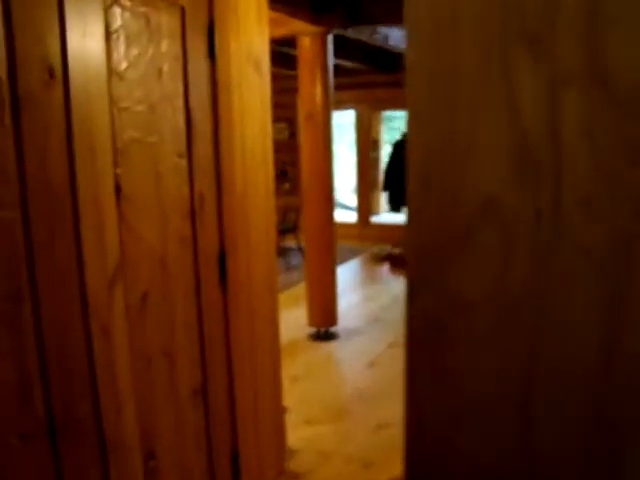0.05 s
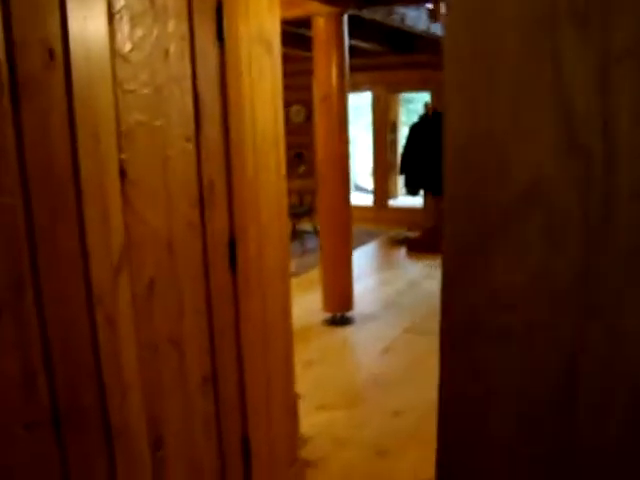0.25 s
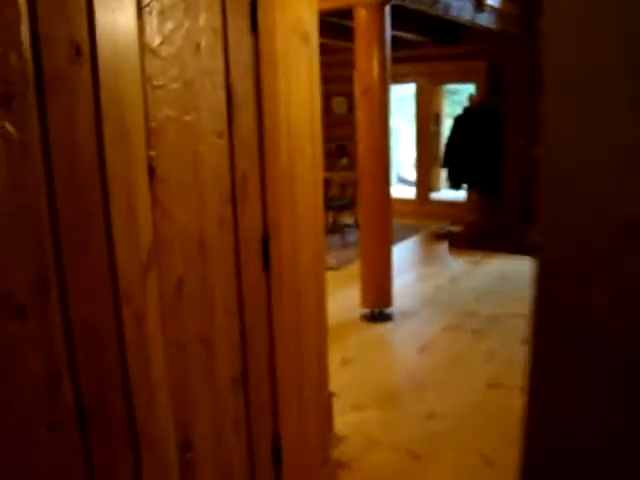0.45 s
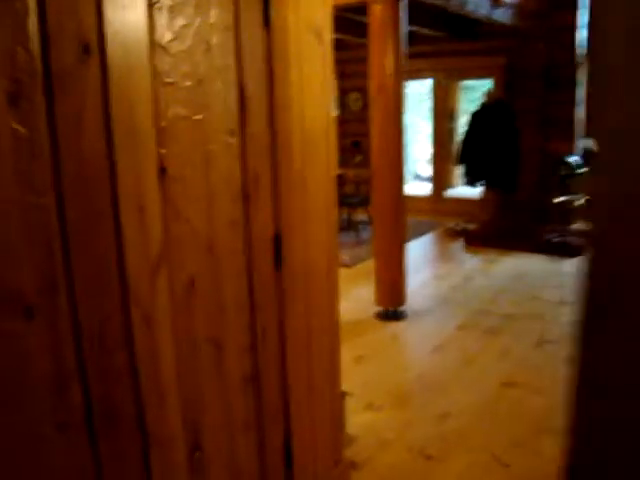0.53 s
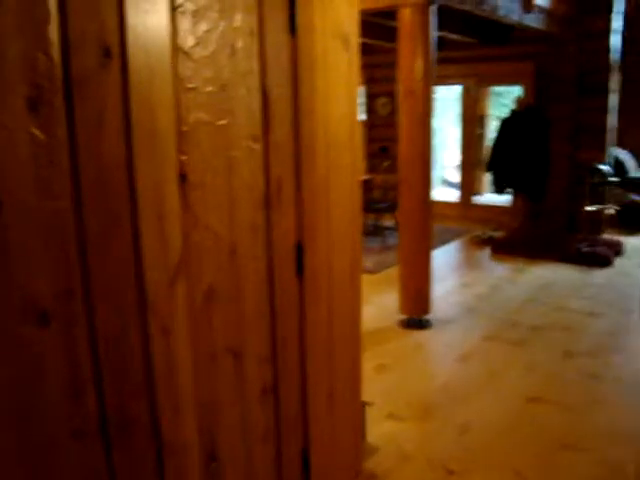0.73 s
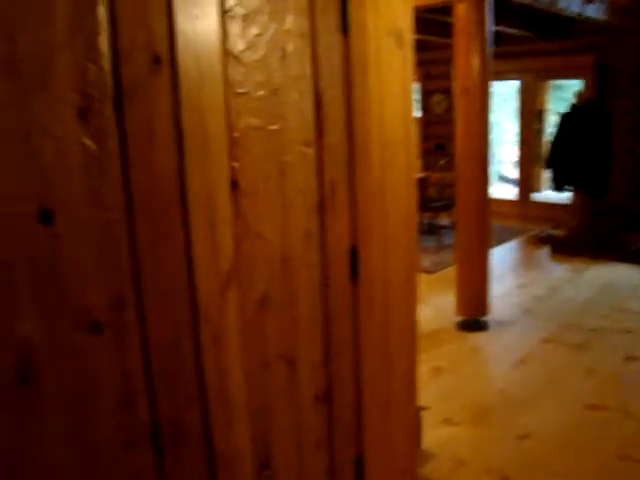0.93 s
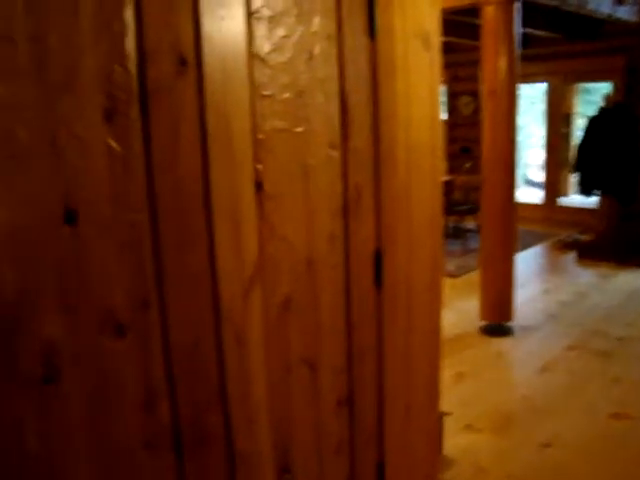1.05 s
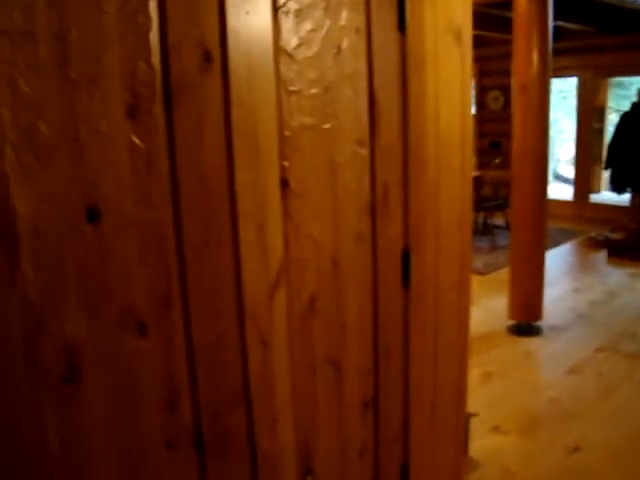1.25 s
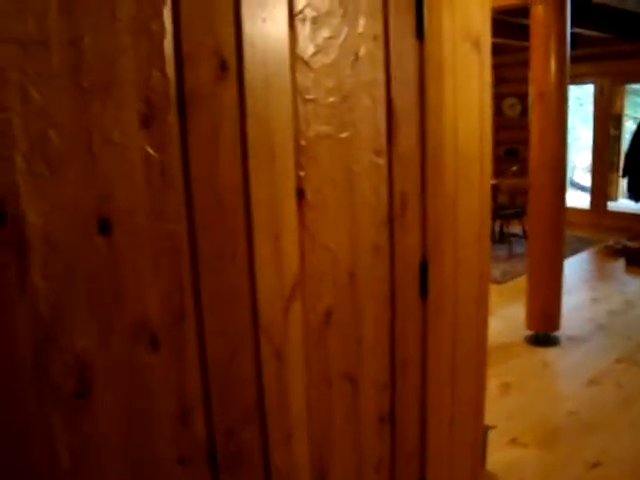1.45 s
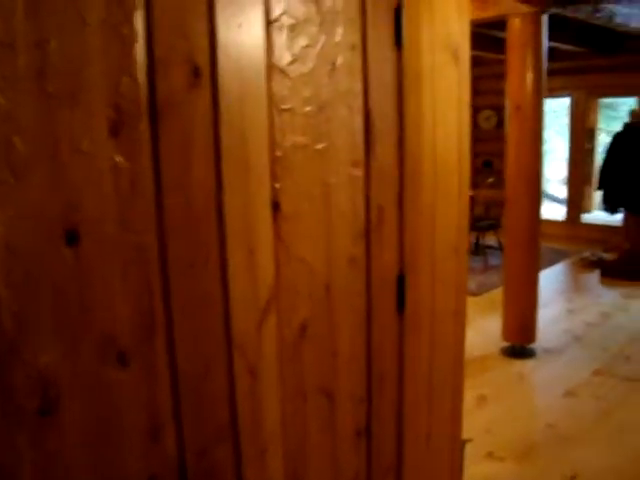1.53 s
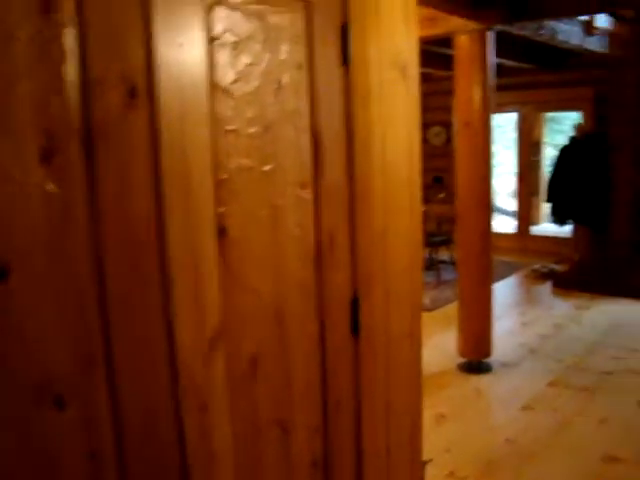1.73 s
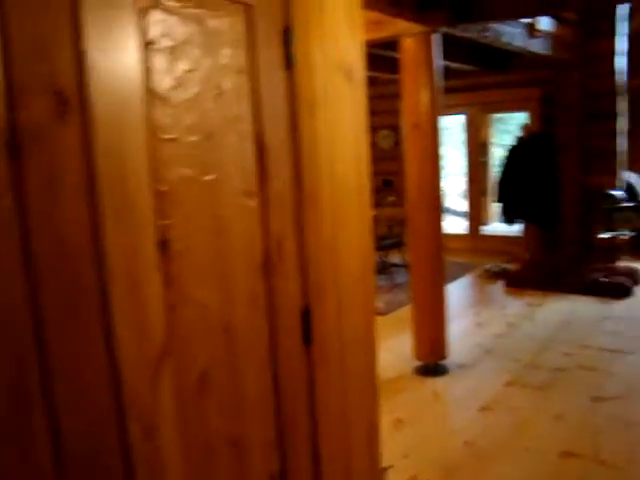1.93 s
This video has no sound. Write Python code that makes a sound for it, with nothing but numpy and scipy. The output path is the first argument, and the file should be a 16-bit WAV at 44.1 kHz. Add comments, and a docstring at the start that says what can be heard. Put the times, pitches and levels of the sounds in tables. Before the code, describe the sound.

A wooden door gives a dry, harsh creak, then a brief loud stutter from its hinge, and settles with several dull knocks. The microphone picks up a slight room echo and steady low hiss inside a quiet cabin.

```python
"""A creaking wooden door

A door swings open in a quiet log cabin. Its dry hinge sticks and slips: a long creak that slows down,
a short run of hard jerks, then a few dull knocks as it comes to rest. Every slip rings the same door
and room. Low hiss lies under it all, with a soft shuffle at first and faint swishes near the end."""
import sys
import numpy as np
from scipy import signal
from scipy.fft import rfft, irfft, next_fast_len
from scipy.io import wavfile
from scipy.ndimage import uniform_filter1d

SR = 44100
rng = np.random.default_rng(int(sys.argv[2]) if len(sys.argv) > 2 else 0)


def dump_mix(stems):
    """Bounce the given channels to the path in sys.argv[1] as a 16-bit WAV at rate SR."""
    frames = np.atleast_2d(stems).T  # one column per channel
    limited = np.clip(frames, -1, 1)  # hard clip at full scale
    pcm = np.round(limited * 32767).astype(np.int16)
    wavfile.write(sys.argv[1], SR, pcm)


N = 88200

# Pace of the creak. Each row: time in seconds, slips per second.
CREAK_RATE = [(.212, 102.1), (.256, 112.1), (.278, 44.5), (.294, 91), (.325, 85.4), (.357, 56.6),
              (.42, 70.6), (.465, 56.9), (.523, 48.8)]
# Levels of the creak's slips and of the background. Each row: time in seconds, level in dB.
CREAK_FORCE = [(.212, -8), (.235, -1), (.265, -10.5), (.295, -2.5), (.38, -1), (.46, 1.5), (.52, 3.5)]
SHUFFLE_LEVEL = [(0, -52.5), (.09, -44), (.15, -48), (.2, -44), (.3, -58.5)]
HISS_LEVEL = [(0, -46), (.65, -51), (1.05, -48), (1.3, -50.5), (1.55, -50.5), (2, -51.5)]
# Single events of the hinge and door. Each row: start in seconds, relative level in dB.
JERKS = [(.7255, 9), (.7455, -24), (.7601, 6), (.7743, 1), (.791, 3.5), (.8159, 4)]
TICKS = [(.221, -11), (.288, -14), (.311, -8), (.732, -4)]
KNOCKS = [(1.154, -29), (1.161, -1.5), (1.172, -1), (1.184, -1), (1.1984, -2), (1.2178, -4.5),
          (1.2437, -4.5)]
BUMPS = [(.935, -11), (1.328, -4.5), (1.340, -0.5)]
# Harmonics of the squeak. Each row: multiple of the slip rate, level in dB.
SQUEAK_HARMONICS = [(3, -40.5), (7, -27), (11, -34), (14, -35), (15, -31.5), (16, -58)]
# Faint swishes. Each row: start in seconds, length in seconds, level in dB.
SWISHES = [(0.066, 0.013, -39), (1.613, 0.084, -43.5), (1.792, 0.17, -43.5)]
# Modes of the door. Each row: frequency in Hz, relative level in dB, 60 dB decay time in seconds.
DOOR_MODES = [(364.7, 0.5, 0.14), (492, 2, .18), (759.2, 1.5, 0.17), (1102, 2, 0.23), (1132.6, 3, 0.19),
              (1245, -0.5, 0.074), (1360, -2, 0.14), (1392, 1, 0.1), (1613, 1.5, 0.14), (1682, -3.5, 0.085),
              (2398, 3, 0.096), (2774, 3, 0.1), (3253, 2, 0.11), (3830, 2.5, .14)]
# Reverberation of the room. Each row: frequency in Hz, 60 dB decay time in seconds.
ROOM_T60 = [(150, 0.71), (500, 0.27), (1500, 0.38), (3500, 0.43), (6000, 0.47), (10000, 0.42)]
# Spectral envelopes of the sources. Each row: frequency in Hz, relative spectral density in dB.
SLIP_COLOUR = [(60, -46), (150, -30), (330, -7), (600, -6.5), (920, -7.5), (1150, -3), (1620, 0.5),
               (1950, -5.5), (2700, -6), (3900, -12.5), (5000, -20), (10000, -27.5)]
GRIT_COLOUR = [(100, -42), (400, -13), (1400, 4), (2500, 2), (3700, 3.5), (5000, -8), (7000, -6),
               (10000, -13)]
TICK_COLOUR = [(500, -29), (3000, -2.5), (5000, 3), (7500, 0), (10000, -1)]
KNOCK_COLOUR = [(60, -52), (200, -13.5), (340, -1.5), (720, 2.5), (1000, -2), (1350, -1.5), (1900, -11.5),
                (3000, -20.5), (5000, -27), (10000, -25)]
BUMP_COLOUR = [(60, -31), (150, 0.5), (350, -0.5), (800, 6.5), (1600, -27), (3000, -51), (10000, -21.5)]
SHUFFLE_COLOUR = [(30, -17), (120, -22.5), (280, -1.5), (430, 5), (700, -11.5), (1400, -9), (3000, -15.5),
                  (10000, -41)]
SWISH_COLOUR = [(100, -35), (1000, -19), (3000, -4.5), (5000, -4), (7000, -0.5), (10000, 0.5)]
HISS_COLOUR = [(15, -56), (25, -29), (88, -18), (365, -2.5), (879, -3.5), (1190, -3.5), (2280, -7.5),
               (3400, -10), (4370, -10), (8180, -15.5), (10000, -13.5), (13000, -73), (22000, -120)]


def hinge():
    """Stick-slip friction: the long creak and the hard jerks excite the same harsh response."""
    slip = slip_response(SLIP_COLOUR, echo_gain=1, snap_t60=.011, rise_s=.0051,
                         wood_db=-1, wood_t60=.048, room_db=-1, ring_db=-8)
    slips = creak_slips()
    creak = amp(-.5) * strike(slips, slip) + amp(-33) * grit(slips)
    jerks = amp(-1) * strike(JERKS, slip) + amp(-38) * grit(JERKS)
    return squeak() + creak + jerks + pin_ticks()


def creak_slips(scatter_db=.5):
    """Relaxation oscillation: the hinge lets go each time it has wound up by one more step."""
    row_times, rate = np.transpose(CREAK_RATE)
    t = np.arange(row_times[0], row_times[-1], 1 / SR)
    steps = np.cumsum(np.interp(t, row_times, rate)) / SR
    starts = np.interp(np.arange(int(steps[-1]) + 1), steps, t)
    force_db = np.interp(starts, *np.transpose(CREAK_FORCE)) + rng.normal(0, scatter_db, len(starts))
    return list(zip(starts, force_db))


def slip_response(colour, echo_gain, snap_t60, rise_s, wood_db, wood_t60, room_db, ring_db):
    """Impulse response to one slip: a snap, its wall echo, plank rattle, reverberation and door modes."""
    t = np.arange(N) / SR
    rise = 1 - np.exp(-t / rise_s)
    snap = norm(rng.standard_normal(N) * rise * decay(t, snap_t60))
    echo = echo_gain * np.roll(snap, int(.0047 * SR))  # from the nearest wall
    planks = norm(rng.standard_normal(N) * rise ** 2 * decay(t, wood_t60))
    blow = snap + echo + amp(wood_db) * planks + amp(room_db) * reverberation(t)
    return recolour(blow, colour) + amp(ring_db) * door_ring(t, colour)


def door_ring(t, colour):
    """Free vibration: each mode is a damped sine, weighted by the spectrum that excites it."""
    ring = sum(amp(db + along(colour, hz)) * decay(t, t60) * np.sin(2 * np.pi * (hz * t + rng.random()))
               for hz, db, t60 in DOOR_MODES)
    return norm(ring * (1 - np.exp(-t / .003)))


def grit(slips, growth=1.97, rise_s=.0011, burst_t60=.049, tail_db=-19, tail_t60=.42):
    """Friction noise: each slip scrapes out a bright burst with a room tail. Incoherent powers add."""
    t = np.arange(N) / SR
    rise = 1 - np.exp(-t / rise_s)
    burst = rise * decay(t, burst_t60)
    tail = rise * amp(tail_db) * decay(t, tail_t60)
    # Doubling the dB gives power; the burst grows faster than the force of the slip.
    burst_power = strike([(start, 2 * growth * db) for start, db in slips], burst ** 2)
    tail_power = strike([(start, 2 * db) for start, db in slips], tail ** 2)
    return np.sqrt(abs(burst_power)) * noise(GRIT_COLOUR) + np.sqrt(abs(tail_power)) * noise(SLIP_COLOUR)


def squeak(start_s=.206, attack_s=.013, hold_s=.012, t60=.33, slip_hz=106.1):
    """Periodic excitation: the first slips are fast and even enough to sing in a harmonic series."""
    t = np.arange(N) / SR - start_s
    swell = np.clip(t / attack_s, 0, 1) * decay(np.maximum(t - hold_s, 0), t60)
    return swell * sum(amp(db) * np.sin(2 * np.pi * (k * slip_hz * t + rng.random()))
                       for k, db in SQUEAK_HARMONICS)


def pin_ticks(t60=.05):
    """Broadband transients: the hinge pin catches with short bursts of treble."""
    burst = rng.standard_normal(N) * decay(np.arange(N) / SR, t60)
    return strike(TICKS, recolour(burst, TICK_COLOUR))


def settling():
    """Impulsive excitation: slower, softer slips sound as dull knocks while the door comes to rest."""
    knock = slip_response(KNOCK_COLOUR, echo_gain=.5, snap_t60=.0071, rise_s=.0017,
                          wood_db=-3, wood_t60=.03, room_db=-5, ring_db=-9.5)
    bump = slip_response(BUMP_COLOUR, echo_gain=.36, snap_t60=.016, rise_s=.0022,
                         wood_db=-2, wood_t60=.021, room_db=-4, ring_db=-9)
    return amp(-5) * strike(KNOCKS, knock) + amp(-13) * strike(BUMPS, bump)


def reverberation(t, build_s=.0031):
    """Diffuse field: dense reflections merge into noise, and each band decays at its own rate."""
    hz, frame_times, bands = signal.stft(rng.standard_normal(N), SR, nperseg=256)
    bands *= decay(frame_times, along(ROOM_T60, hz)[:, None])
    tail = signal.istft(bands, SR, nperseg=256)[1][:N]
    return norm(tail * (1 - np.exp(-t / build_s)))


def rustle(edge_s=.0083):
    """Amplitude-modulated noise: a low shuffle and a few thin swishes, perhaps of clothing."""
    t = np.arange(N) / SR
    swell = sum(amp(db) * np.clip(np.minimum(t - start, start + length - t) / edge_s + .5, 0, 1)
                for start, length, db in SWISHES)
    return swell * noise(SWISH_COLOUR) + amp(curve(SHUFFLE_LEVEL)) * noise(SHUFFLE_COLOUR)


def hiss():
    """Noise floor: room tone and microphone hiss, drifting slowly in level."""
    return amp(curve(HISS_LEVEL)) * noise(HISS_COLOUR)


def strike(events, response):
    """Convolution: the response sounds once for each event, given as start in seconds and level in dB."""
    pulses = np.zeros(N)
    for start, db in events:
        pulses[int(start * SR)] += amp(db)
    return signal.fftconvolve(pulses, response)[:N]


def recolour(x, colour, smooth_bins=360):
    """Minimum-phase filtering gives a blow a broad spectral shape without smearing its attack."""
    hz = np.fft.rfftfreq(N, 1 / SR)
    spectrum = rfft(x, N)
    smooth_power = abs(uniform_filter1d(abs(spectrum) ** 2, smooth_bins))
    gain = amp(along(colour, hz)) / np.sqrt(smooth_power)
    cepstrum = irfft(np.log(gain), N)
    cepstrum[1:N // 2] *= 2  # folding onto positive time makes the filter causal
    cepstrum[N // 2 + 1:] = 0
    return norm(irfft(spectrum * np.exp(rfft(cepstrum)), N))


def noise(colour):
    """Spectral shaping turns white noise into coloured noise of rms 1."""
    x = filtered(rng.standard_normal(N), lambda hz: amp(along(colour, hz)))
    return x / x.std()


def filtered(x, response):
    """Linear filtering multiplies the spectrum by a frequency response."""
    size = next_fast_len(len(x) + SR // 2)
    return irfft(rfft(x, size) * response(np.fft.rfftfreq(size, 1 / SR)), size)[:len(x)]


def along(points, hz):
    """Interpolation on a logarithmic frequency axis."""
    frequencies, values = np.transpose(points)
    return np.interp(np.log(hz + 1), np.log(frequencies + 1), values)


def curve(points):
    """Linear interpolation in time, one value per sample."""
    return np.interp(np.arange(N) / SR, *np.transpose(points))


def decay(t, t60):
    """Exponential damping by 60 dB every t60 seconds."""
    return amp(-60 * t / t60)


def amp(db):
    """Amplitude ratio of a level in decibels."""
    return 10 ** (np.asarray(db) / 20)


def norm(x):
    """Normalisation to unit energy."""
    return x / np.linalg.norm(x)


def scene():
    """Superposition: all sources add at one microphone."""
    return (hinge() + settling() + rustle() + hiss())[None]


def record(dry, top_hz=10120):
    """Band limiting: an ideal low-pass filter removes the highest treble."""
    return np.array([filtered(x, lambda hz: hz < top_hz) for x in dry])


dry = scene()
out = record(dry)
dump_mix(out)
```